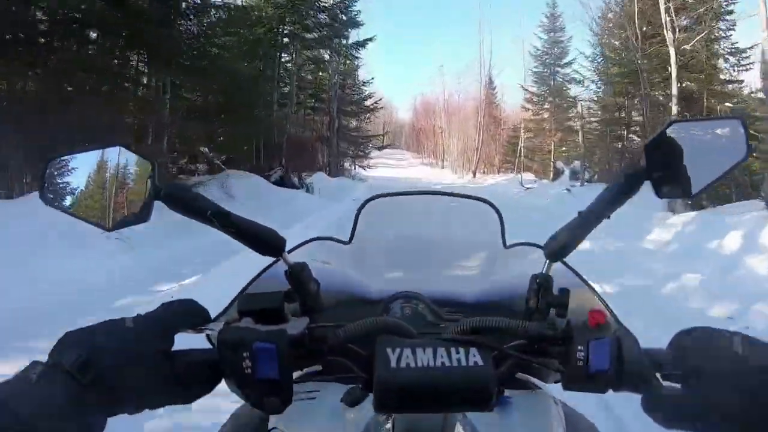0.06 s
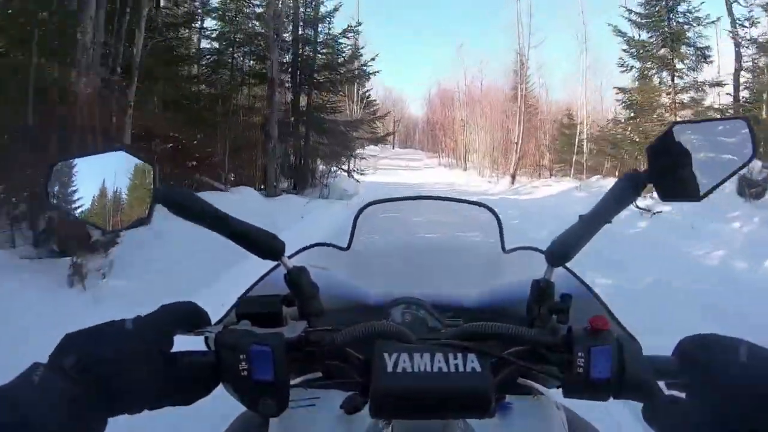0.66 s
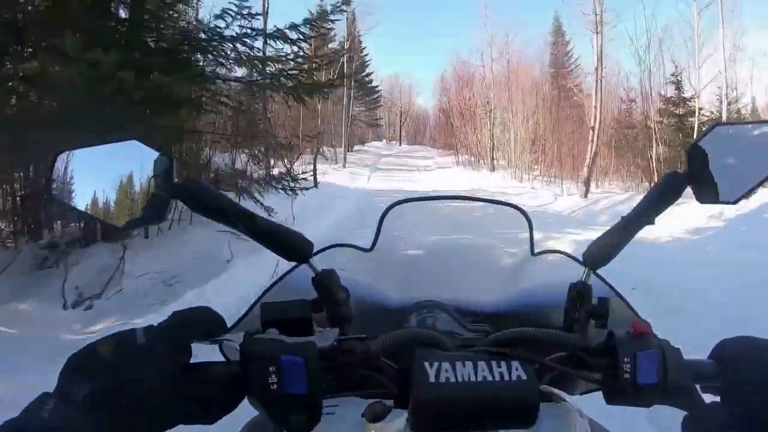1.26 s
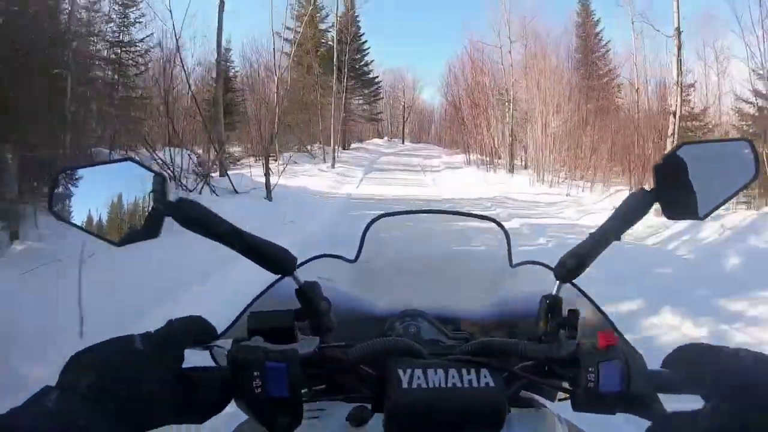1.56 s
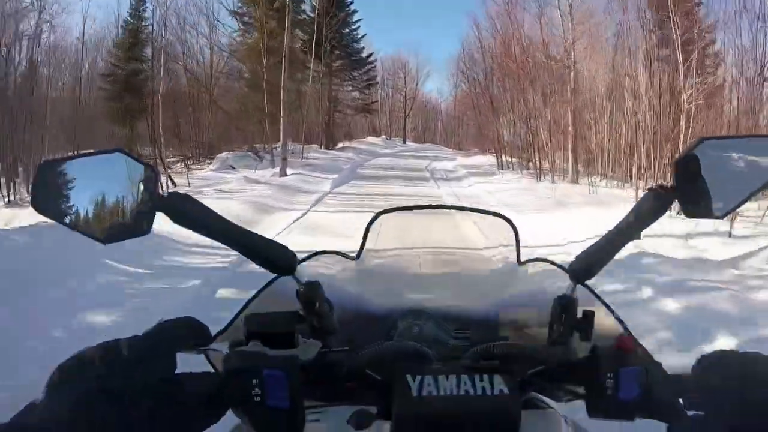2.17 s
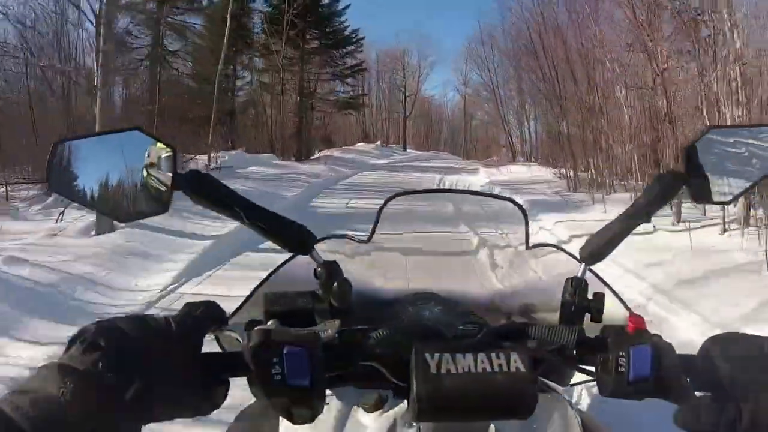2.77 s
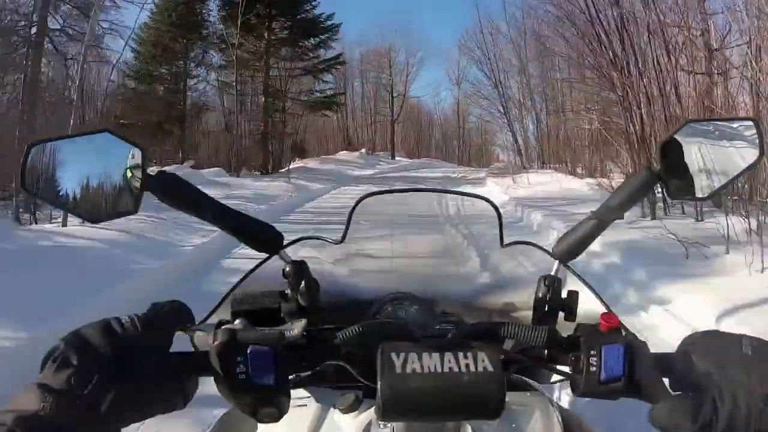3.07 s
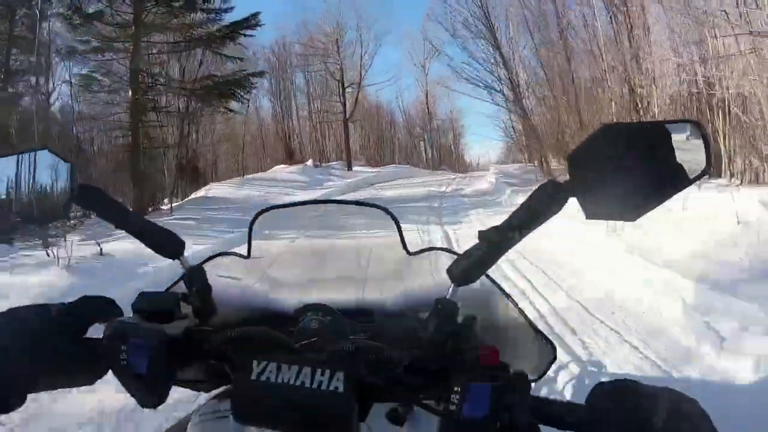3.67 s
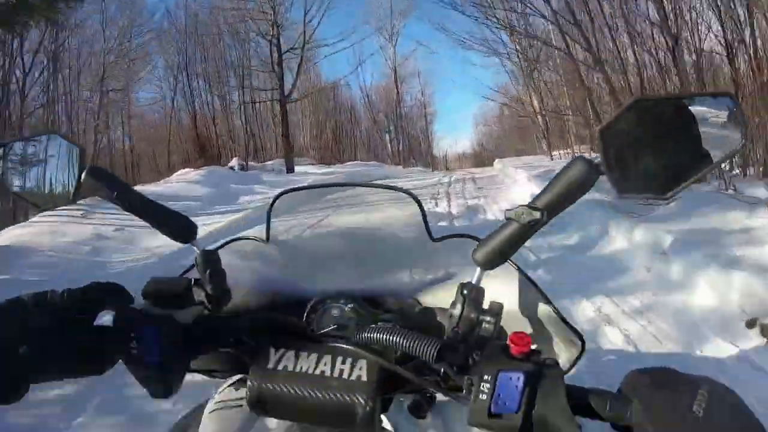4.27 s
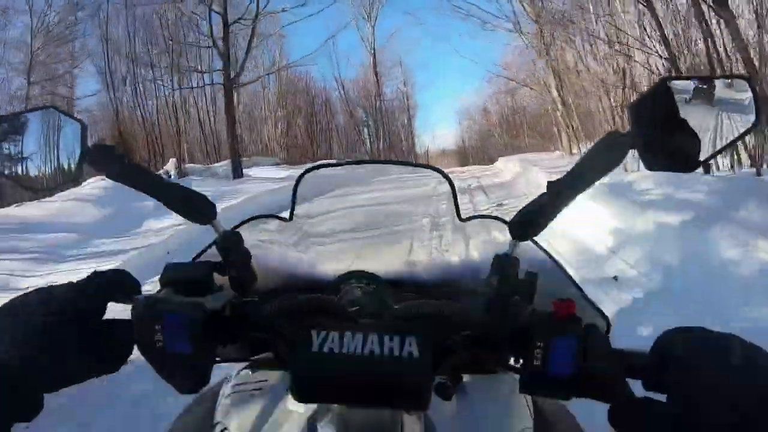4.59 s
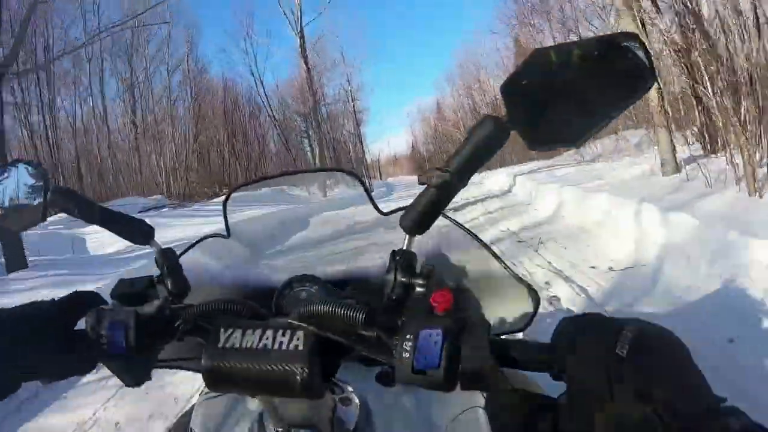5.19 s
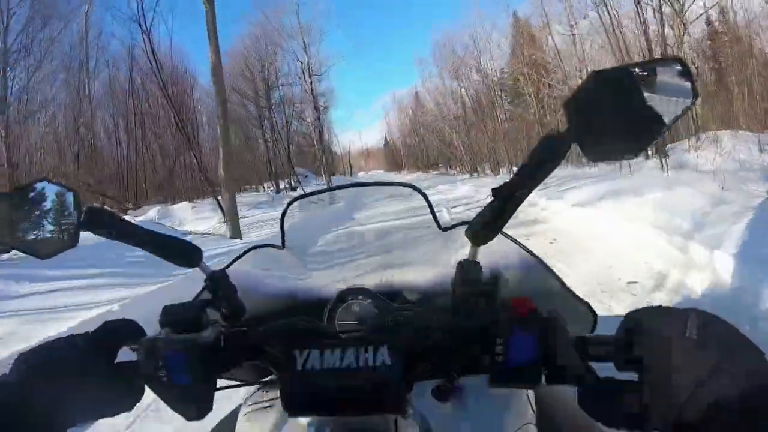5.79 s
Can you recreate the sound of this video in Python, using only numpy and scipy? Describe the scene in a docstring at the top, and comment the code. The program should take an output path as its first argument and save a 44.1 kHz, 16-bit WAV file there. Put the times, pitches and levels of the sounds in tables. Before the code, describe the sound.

A snowmobile runs at speed along a packed snow trail, heard from the rider's seat. Its engine buzzes over a deep track drone, while snow rushes under the skis and wind buffets the microphone. The engine eases off and the pitch sinks. Bumps knock the suspension, a few with a metallic clink, and the belt squeals faintly. After a brief throttle blip, the engine revs up again near the end.

```python
"""A snowmobile on a packed trail, heard from the rider's seat. It starts at speed: track lugs drone on the
sprocket, the chain case whines, snow rushes under the skis and wind buffets the microphone.
The three-cylinder engine eases off, and around 2 s its exhaust note drops away as the sled coasts.
While it slows, bumps knock the suspension and the belt squeals. The throttle blips at 4.2 s,
then opens near 5 s and the engine picks up again."""
import sys
import numpy as np
from scipy import signal
from scipy.fft import rfft, irfft, next_fast_len
from scipy.io import wavfile
from scipy.ndimage import uniform_filter1d, minimum_filter1d

SR = 44100
rng = np.random.default_rng(int(sys.argv[2]) if len(sys.argv) > 2 else 0)


def waveform_to_disk(signal):
    """Save audio, clipped to [-1, 1], as 16-bit WAV at the path in sys.argv[1]."""
    frames = np.transpose(np.atleast_2d(signal))
    scaled = np.clip(frames, -1, 1) * 32767
    samples = np.round(scaled).astype(np.int16)
    wavfile.write(sys.argv[1], SR, samples)


N = 257527
T = np.arange(N) / SR
SPROCKET_TEETH, TRACK_LUGS = 8, 57
CRUISE_LUG_HZ, CRUISE_FIRING_HZ = 180, 121.4


def amp(db):
    """Decibels to gain."""
    return 10 ** (np.asarray(db) / 20)


def unit_rms(x):
    """Scales to an rms of one."""
    return x / np.sqrt(np.mean(x ** 2) + 1e-20)


def curve(rows):
    """(time_s, value) rows, interpolated per sample."""
    return np.interp(T, *np.transpose(rows))


def swells_db(rows):
    """Bell-shaped rises or dips from (centre_s, half_width_s, gain_db) rows."""
    t = np.arange(0, T[-1], 1 / 1000)
    bells_db = sum(db * np.exp(-.5 * ((t - centre_s) / width_s) ** 2) for centre_s, width_s, db in rows)
    return np.interp(T, t, bells_db)


def bursts(rows, decay_s):
    """Envelope that jumps at each (start_s, peak_db) and decays."""
    out, fall = np.zeros(N), np.exp(-T[:SR // 10] / decay_s)
    for start_s, peak_db in rows:
        part = out[round(start_s * SR):][:len(fall)]
        part += amp(peak_db) * fall[:len(part)]
    return out


def response_db(spectrum, hz):
    """A spectrum's level at hz, interpolated in log frequency."""
    freq_hz, gain_db = np.transpose(spectrum)
    return np.interp(np.log(hz + 1), np.log(freq_hz), gain_db)


def coloured(x, spectrum):
    """Filters x by a spectrum, to unit rms."""
    size = next_fast_len(N)
    gain = amp(response_db(spectrum, np.fft.rfftfreq(size, 1 / SR)))
    return unit_rms(irfft(rfft(x, size) * gain, size)[:N])


def drift(rate_hz):
    """Smooth random motion of unit size, up to about rate_hz."""
    size, grid_hz = 8192, 1024
    lowpass = np.exp(-.5 * (np.fft.rfftfreq(size, 1 / grid_hz) / rate_hz) ** 2)
    slow = irfft(rfft(rng.standard_normal(size)) * lowpass)
    return np.interp(T, np.arange(size) / grid_hz, unit_rms(slow))


def phase_of(hz):
    """Running phase of a changing rate, in radians."""
    return 2 * np.pi * np.cumsum(hz) / SR


def tone(phase, rms_db):
    """Sine with a random starting phase."""
    return np.sqrt(2) * amp(rms_db) * np.cos(phase + 2 * np.pi * rng.random())


def noise_band(phase, width_hz):
    """Narrow noise centred on a running phase."""
    return drift(width_hz / 2) * np.cos(phase) + drift(width_hz / 2) * np.sin(phase)


# freq_hz, gain_db
WIND_SPECTRUM = [(8, -3.5), (20, 1.5), (35, 1.5), (55, 4), (90, 4), (140, -4), (220, -5.5), (320, -5),
                 (600, -25.5), (1500, -75.5)]
# centre_s, half_width_s, gain_db
GUSTS = [(1.7, .35, 3), (2.43, .06, 6), (3.5, .03, 5.5), (4.05, .2, 2.5), (4.45, 0.048, 4)]


def wind(lug_hz, db_per_octave=3):
    """Eddies behind the windshield push on the microphone, harder at speed."""
    buffet_db = -16 + db_per_octave * np.log2(lug_hz / CRUISE_LUG_HZ) + swells_db(GUSTS)
    return amp(buffet_db + .88 * drift(7.9)) * coloured(rng.standard_normal(N), WIND_SPECTRUM)


# time_s, roughness_db
TRAIL_ROUGHNESS = [(0, -0.5), (1, 0.5), (2.2, -1), (3.9, 1), (4.35, 1.5), (5, .5), (5.4, -1), (5.84, -1.5)]
# centre_s, half_width_s, gain_db
TRAIL_HUMPS = [(.12, .08, 2.5), (.47, 0.025, 3), (1.48, 0.073, 2), (3.24, 0.042, 0), (4.37, 0.12, 3),
               (4.62, 0.037, 2.5), (5, 0.054, 3.5), (5.24, 0.075, 2.5), (5.8, 0.1, 5.5)]
# freq_hz, gain_db
CHASSIS_SPECTRUM = [(60, -4.5), (130, 14.5), (230, 15), (300, 5.5), (380, 5.5), (500, 1.5), (650, 0.5),
                    (900, -5.5), (1200, -12.5), (2000, -28), (4000, -68.5)]
SNOW_SPECTRUM = [(400, -15), (900, -3.5), (1100, -2.5), (1300, 0), (1620, 1), (1950, 1), (2250, -1.1),
                 (2750, -2.2), (3300, -8), (4000, -16), (4600, -25), (5500, -39), (8000, -57)]
SPRAY_SPECTRUM = [(2500, -16), (4200, 0), (5000, -5.5), (5700, -9), (6400, -4.5), (7100, -2.5),
                  (8000, -6.5), (9000, -13), (10200, -16.5), (11500, -36), (13000, -40), (15800, -37.5)]


def running_gear(lug_hz, firing_phase, crumbs_per_s=250):
    """The chassis rumbles and snow rushes and sprays, throbbing with each sprocket turn and track lap."""
    trail_db, hump_db = curve(TRAIL_ROUGHNESS), swells_db(TRAIL_HUMPS)
    rumble_db = -15.5 + .55 * trail_db + hump_db
    rush_db = -27 + trail_db + hump_db
    spray_db = -50.5 + 1.8 * trail_db + .36 * hump_db + 1.5 * np.log2(lug_hz / CRUISE_LUG_HZ)
    lug_phase = phase_of(lug_hz)
    throb_db = .53 * np.cos(lug_phase / SPROCKET_TEETH) + .5 * np.cos(lug_phase / TRACK_LUGS)
    throb_db += .9 * drift(45)
    beat = 1 + .059 * np.cos(lug_phase) + .063 * np.cos(firing_phase)
    rumble, rush, spray = rng.standard_normal((3, N)) * beat * amp(throb_db)
    # crumbs of crust pelt the tunnel
    crumbs = (rng.random(N) < crumbs_per_s / SR) * rng.standard_normal(N) * amp(7.5)
    return (amp(rumble_db) * coloured(rumble, CHASSIS_SPECTRUM)
            + amp(rush_db + .5 * drift(37)) * coloured(rush + crumbs, SNOW_SPECTRUM)
            + amp(spray_db + 1.3 * drift(33)) * coloured(spray + crumbs, SPRAY_SPECTRUM))


# start_s, peak_db
TICKS = [(.789, -36), (3.321, -30), (4.690, -31)]


def ticks():
    """Thin, sharp bursts of noise."""
    return bursts(TICKS, decay_s=.0003) * rng.standard_normal(N)


# centre_s, half_width_s, gain_db
THIN_RING_SWELLS = [(1.7, .5, 8.5), (3.2, .4, 8)]


def thin_ring(pitch_hz=7050):
    """A faint treble ring that swells twice."""
    return amp(-70 + swells_db(THIN_RING_SWELLS)) * noise_band(2 * np.pi * pitch_hz * T, width_hz=300)


# start_s, clatter_db, centre_hz, decay_s, ring_db
BUMPS = [(1.447, -12.5, 1200, 0.009, -46), (1.867, -14, 2100, 0.0077, -42), (2.062, -8, 840, 0.01, -42),
         (2.403, -9.5, 800, 0.015, -52), (2.452, -11, 1300, 0.0049, -43), (3.271, -6.5, 610, 0.01, -48),
         (3.351, -12.5, 2170, 0.0051, -23.5), (3.369, -25, 2400, 0.0056, -30),
         (3.928, -10.5, 1000, 0.0068, -55), (4.357, -13, 2200, 0.0057, -24.5),
         (4.377, -22, 3300, 0.004, -25), (5.024, -17, 3200, 0.0054, -28), (5.226, -19, 1700, 0.0094, -48)]
# pitch_hz, gain_db, t60_s
STEEL_MODES = [(3550, -5, 0.058), (4030, 5.5, 0.052), (4130, -3.5, 0.07), (4524, -3.5, 0.081),
               (6170, -16, 0.071)]


def knocks(rise_share=.6, ring_rise_s=.001):
    """Suspension and skis hit bumps with a short, dull clatter; hard hits ring the steel."""
    out = np.zeros(N)
    t = np.arange(SR // 8) / SR
    hz = np.fft.rfftfreq(len(t), 1 / SR)
    for start_s, clatter_db, centre_hz, decay_s, ring_db in BUMPS:
        band = np.exp(-.5 * (np.log((hz + 1) / centre_hz) / .51) ** 2) / (1 + (hz / 3700) ** 8)
        clatter = unit_rms(irfft(rfft(rng.standard_normal(len(t))) * band, len(t)))
        clatter *= np.exp(-t / decay_s) * (1 - np.exp(-t / (rise_share * decay_s)))
        ring = sum(tone(2 * np.pi * pitch_hz * t, gain_db - 60 * t / t60_s)
                   for pitch_hz, gain_db, t60_s in STEEL_MODES)
        ring *= 1 - np.exp(-t / ring_rise_s)
        part = out[round(start_s * SR):][:len(t)]
        part += (amp(clatter_db) * clatter + amp(ring_db - 12.5) * ring)[:len(part)]
    return out


def cracks():
    """Each knock opens with a bright crack, scaled to its steel ring."""
    envelope = bursts([(start_s, ring_db - 14) for start_s, *_, ring_db in BUMPS], decay_s=.0033)
    return envelope * coloured(rng.standard_normal(N), SPRAY_SPECTRUM)


# pitch_hz, width_hz, level_db
PANEL_MODES = [(1603, 51, -36), (1946, 100, -39), (2490, 70, -44.5)]


def hood_panels(throttle_db):
    """The engine shakes the hood's panels into ringing, louder under throttle."""
    modes = sum(amp(level_db) * noise_band(2 * np.pi * pitch_hz * T, width_hz)
                for pitch_hz, width_hz, level_db in PANEL_MODES)
    return amp(.32 * throttle_db) * modes


# lug_order, width_hz, level_db, swell_centre_s, swell_half_width_s, swell_db
CHAIN_LINES = [(4.21, 21, -43, 1.3, .45, 11), (8.43, 30, -41, 4.55, 0.21, 6)]


def chain_whine(lug_phase):
    """The chain meshes unevenly: fuzzy lines in step with the track, each swelling once."""
    return sum(amp(level_db + swells_db([swell])) * noise_band(order * lug_phase, width_hz)
               for order, width_hz, level_db, *swell in CHAIN_LINES)


# centre_s, half_width_s, gain_db
BELT_SQUEALS = [(1.4, 0.44, 8), (3.45, 0.23, 8.4), (3.42, 0.008, 9), (3.52, .012, 9.6), (3.573, .013, 9.6),
                (4.5, .6, 9), (4.1, .012, 11)]


def belt_squeal(lug_phase, lug_order=12.5, chatter_db=4):
    """The belt squeals and chirps, gripping and slipping once per sprocket turn."""
    slip_db = chatter_db * (np.cos(lug_phase / SPROCKET_TEETH) - .5)
    level_db = -47.5 + swells_db(BELT_SQUEALS) + slip_db
    return amp(level_db) * noise_band(lug_order * lug_phase, width_hz=170)


# freq_hz, gain_db
CLATTER_SPECTRUM = [(500, -14.5), (850, 2.5), (1100, 1), (1350, -5.5), (1620, 1.5), (1950, 0.5),
                    (2150, -5.5), (2500, -3), (2900, -3.5), (3400, -15), (4000, -25), (5500, -45.5)]


def valve_clatter(firing_phase, firing_hz, throttle_db):
    """Valves and gears repeat one clatter every six firings, louder at high revs."""
    cycle = rng.standard_normal(1500)
    cycles_done = firing_phase / (6 * 2 * np.pi)
    clatter = np.interp(cycles_done, np.arange(len(cycle)) / len(cycle), cycle, period=1)
    revs_db = 24 * np.log2(firing_hz / firing_hz.max())
    return amp(-26 + throttle_db + revs_db) * coloured(clatter, CLATTER_SPECTRUM)


def intake(firing_phase, throttle_db, firing_order=4.8):
    """Air drawn past the throttle roars in a band that climbs with engine speed."""
    return amp(-32 + throttle_db) * noise_band(firing_order * firing_phase, width_hz=240)


# firing_order, level_db
UPPER_ORDERS = [(8 / 3, -34), (10 / 3, -39.5), (4, -28.5), (14 / 3, -32.5), (5, -28.5), (16 / 3, -38),
                (17 / 3, -36), (6, -32.5), (7, -36.5), (7.3, -41)]
# freq_hz, gain_db
HOOD_RESPONSE = [(300, 2.5), (390, 1), (465, 3.5), (520, -2.5), (610, -2), (690, -2.5), (780, -2.5),
                 (920, -1.5), (1100, 0)]


def engine_buzz(firing_phase, firing_hz, throttle_db):
    """Upper firing orders, coloured by the hood; unequal cylinders put thirds between them."""
    out = np.zeros(N)
    for order, level_db in UPPER_ORDERS:
        hood_db = response_db(HOOD_RESPONSE, order * firing_hz)
        out += tone(order * firing_phase, level_db + hood_db + .75 * throttle_db + 2.2 * drift(13))
    return out


# freq_hz, level_db
PIPE_RESPONSE = [(110, -23), (135, -19.5), (152, -20.5), (220, -19.5), (235, -17), (250, -25), (272, -23),
                 (305, -15.5), (335, -24.5), (380, -28.5), (460, -35)]


def exhaust(firing_phase, firing_hz, throttle_db, coast_from_s=1.7, coast_to_s=2.55, fade_s=.53):
    """The lowest three firing orders sound through the pipe and drop away while the sled coasts."""
    coasting = np.clip(.5 + np.minimum(T - coast_from_s, coast_to_s - T) / fade_s, 0, 1)
    load_db = .14 * throttle_db - 19 * coasting
    out = np.zeros(N)
    for order in (1, 2, 3):
        pipe_db = response_db(PIPE_RESPONSE, order * firing_hz)
        push_db = .28 * throttle_db if order == 1 else 0
        out += tone(order * firing_phase, pipe_db + load_db + push_db + 2 * drift(30))
    return out


# time_s, level_db
DRONE_LEVEL = [(0, -11.5), (.65, -14.5), (1.35, -11.5), (1.95, -12.5), (2.35, -8), (3.31, -8.5),
               (3.36, -16), (3.8, -19.5), (4, -13), (4.35, -15.5), (4.6, -12.5), (5.3, -11), (5.84, -14.5)]
# centre_s, half_width_s, gain_db
DRONE_DIPS = [(.62, 0.025, -10), (2.03, 0.03, -8), (3.88, 0.044, -5), (5.73, 0.04, -8)]
# freq_hz, level_db
TUNNEL_RESPONSE = [(290, -26), (340, -30), (400, -24), (455, -23.5), (520, -42), (600, -31), (700, -44.5),
                   (900, -41), (1400, -46.5)]


def track(lug_hz, firing_hz, roar_order=4.4):
    """Rubber lugs strike the sprocket: a deep drone, overtones coloured by the tunnel, and a roar."""
    phase = phase_of(lug_hz) + .1 * drift(41)
    drone = tone(phase, curve(DRONE_LEVEL) + swells_db(DRONE_DIPS) + .62 * drift(21))
    # revs pull the track taut, so it slaps less
    slap_db = -2 - 17.5 * np.log2(firing_hz / CRUISE_FIRING_HZ)
    overtones = np.zeros(N)
    for order in range(2, 8):
        tunnel_db = response_db(TUNNEL_RESPONSE, order * lug_hz)
        overtones += tone(order * phase + .32 * drift(27), tunnel_db + slap_db + 2 * drift(16))
    roar = amp(-34) * noise_band(roar_order * phase, width_hz=220)
    return drone + overtones + roar


# time_s, lug_hz
TRACK_SPEED = [(0, 192.3), (.2, 196.1), (.85, 213.5), (1.2, 217.1), (1.5, 215.4), (1.8, 209.3),
               (2.15, 200.6), (2.6, 193.5), (3.8, 164.7), (4.4, 152.4), (4.75, 148.3), (5.5, 151.3),
               (5.84, 151.6)]
# time_s, firing_hz
ENGINE_SPEED = [(0, 150.7), (.6, 155.6), (.95, 152.5), (1.4, 139), (1.6, 129.8), (2.1, 120.2),
                (2.55, 115.2), (3.25, 112.8), (3.8, 108.8), (4.3, 107.5), (4.75, 111.5), (5.3, 127),
                (5.84, 134.4)]
# time_s, throttle_db
THROTTLE = [(0, 1), (.3, -.5), (1.3, -12.5), (3.2, -17.5), (4.2, -5), (4.6, -14.5), (5.05, 3), (5.84, 2.5)]


def scene():
    """Ground speed drives track, chain, belt and wind; revs and throttle drive the engine. Mono."""
    lug_hz, firing_hz, throttle_db = curve(TRACK_SPEED), curve(ENGINE_SPEED), curve(THROTTLE)
    lug_phase = phase_of(lug_hz)
    firing_phase = phase_of(firing_hz * (1 + .0012 * drift(10.8)))
    drive = track(lug_hz, firing_hz) + chain_whine(lug_phase) + belt_squeal(lug_phase)
    engine = (exhaust(firing_phase, firing_hz, throttle_db)
              + engine_buzz(firing_phase, firing_hz, throttle_db)
              + intake(firing_phase, throttle_db)
              + valve_clatter(firing_phase, firing_hz, throttle_db)
              + hood_panels(throttle_db))
    background = thin_ring() + running_gear(lug_hz, firing_phase) + wind(lug_hz)
    return (drive + engine + background + knocks() + cracks() + ticks())[None]


def record(dry, ceiling=1.03, cutoff_hz=15900):
    """A fast limiter holds peaks near full scale, the tips clip, then a low-pass."""
    gain = np.minimum(1, ceiling / (abs(dry) + 1e-9))
    gain = minimum_filter1d(gain, size=201)
    gain = uniform_filter1d(uniform_filter1d(gain, size=101), size=101)
    limited = np.clip(dry * gain, -1, 1)
    lowpass = signal.firwin(511, cutoff_hz, window=("kaiser", 9), fs=SR)
    return signal.oaconvolve(limited, lowpass[None], "same")


dry = scene()
out = record(dry)
waveform_to_disk(out)
```